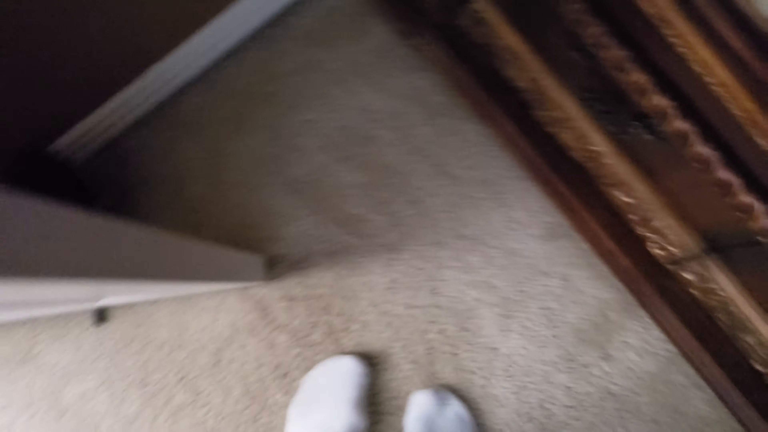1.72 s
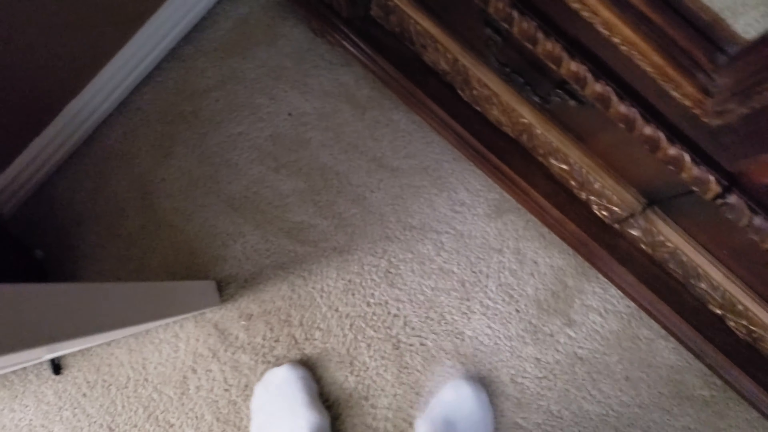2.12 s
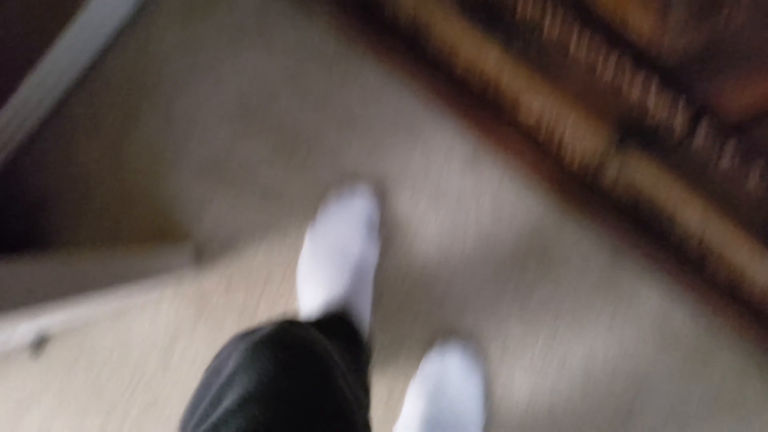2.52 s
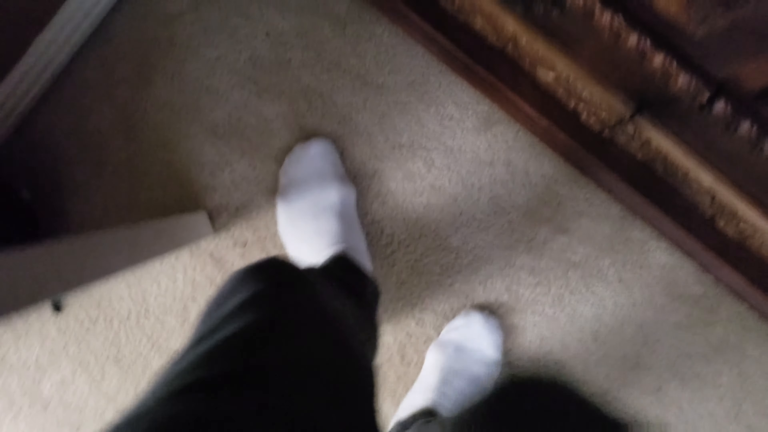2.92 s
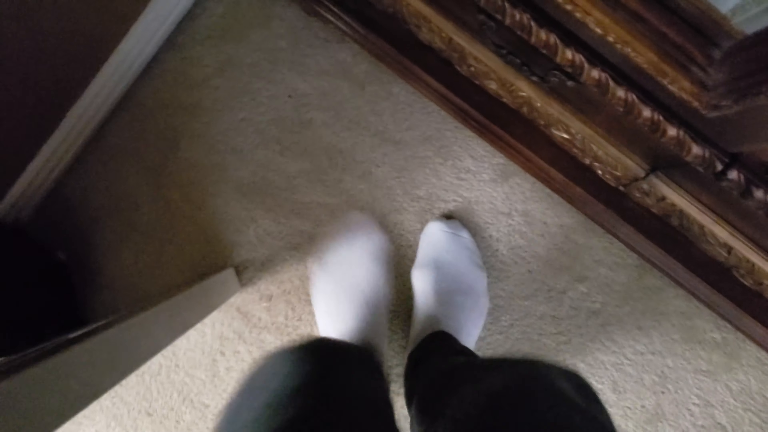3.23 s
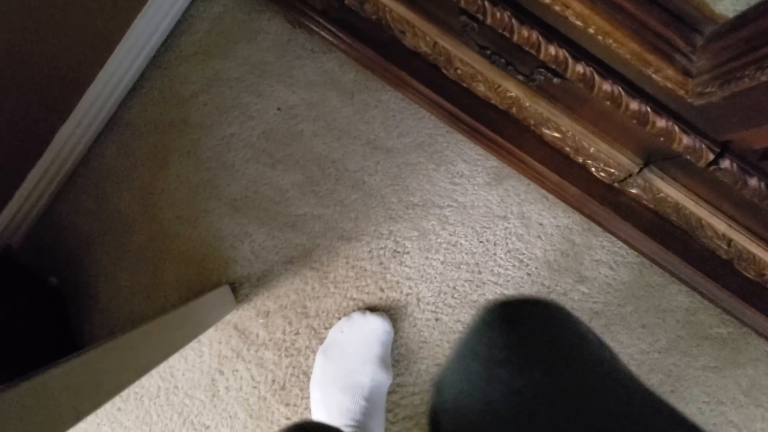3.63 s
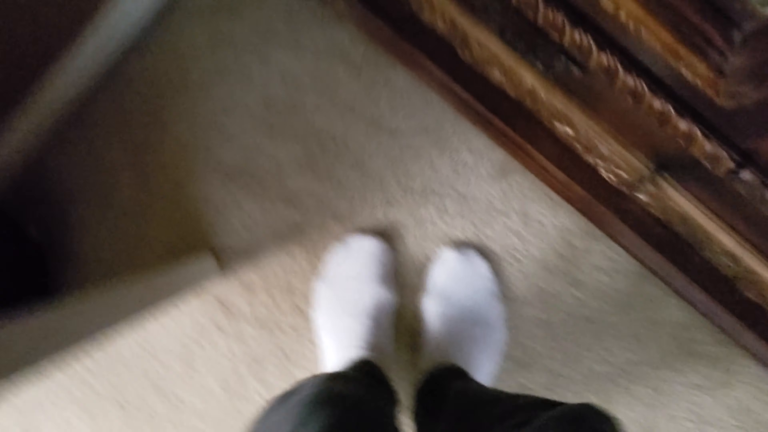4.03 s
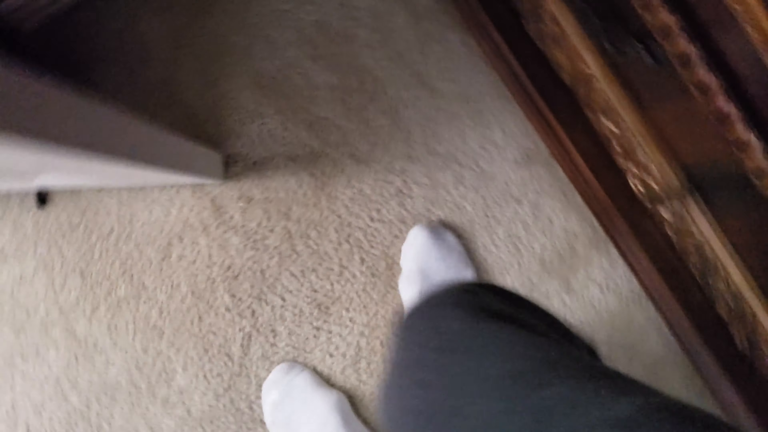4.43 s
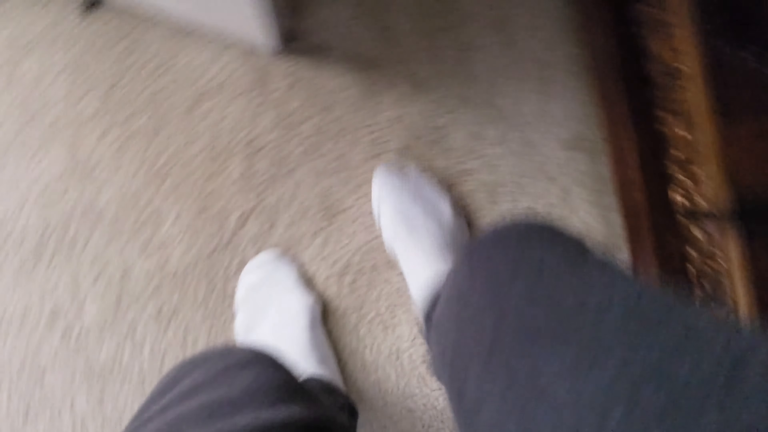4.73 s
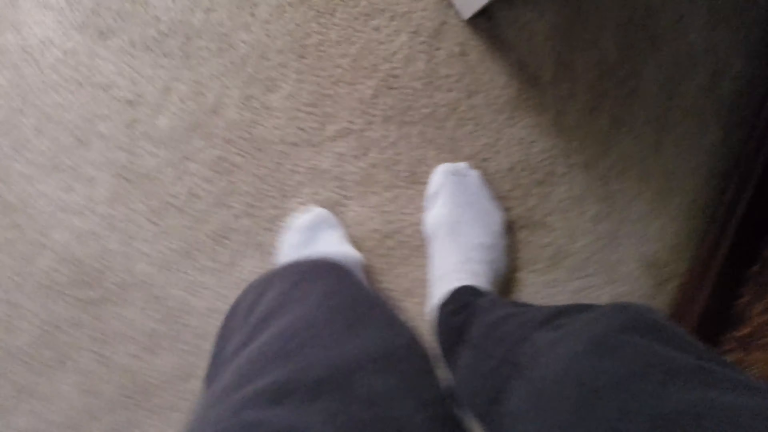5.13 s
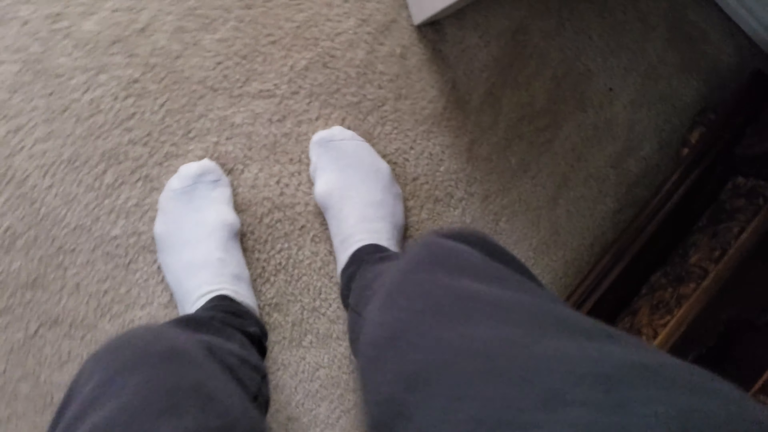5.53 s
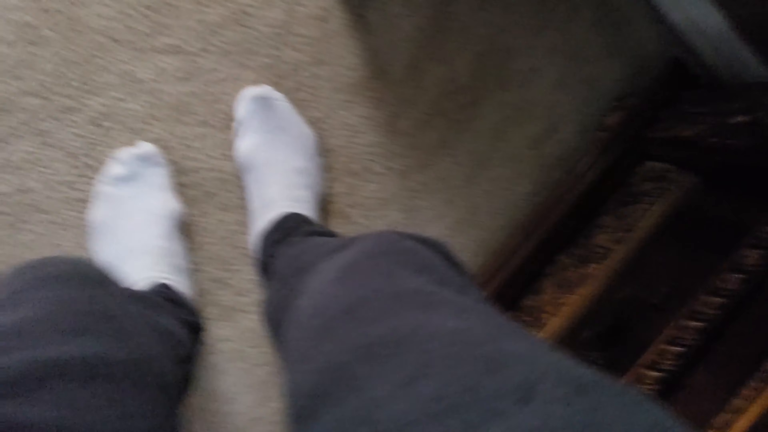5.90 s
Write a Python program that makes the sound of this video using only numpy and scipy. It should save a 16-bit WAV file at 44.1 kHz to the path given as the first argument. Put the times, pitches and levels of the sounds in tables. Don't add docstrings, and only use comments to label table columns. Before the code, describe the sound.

A door leaf brushes carpet, thuds softly and its latch knocks twice, then socked feet step and shuffle away over thick pile in a quiet house.

```python
import sys
import numpy as np
from scipy import signal
from scipy.fft import rfft, irfft
from scipy.io import wavfile
from scipy.ndimage import uniform_filter1d

SR = 44100
rng = np.random.default_rng(int(sys.argv[2]) if len(sys.argv) > 2 else 0)


def generate_wav(signal):
    frames = np.transpose(np.atleast_2d(signal))
    scaled = np.clip(frames, -1, 1) * 32767
    pcm = np.round(scaled).astype(np.int16)
    wavfile.write(sys.argv[1], SR, pcm)


def voltage_ratio(decibels):
    exponent = np.asarray(decibels, float) / 20
    return 10 ** exponent


N = 267246


def rms_one(x):
    return x / np.sqrt(np.mean(x ** 2) + 1e-20)


def in_time(rows):
    s, *columns = np.transpose(rows)
    return [np.interp(np.arange(N) / SR, s, column) for column in columns]


def at_hz(points, hz):
    points_hz, values = np.array(points)[:, 0], np.array(points)[:, 1]
    return np.interp(np.log(hz), np.log(points_hz), values)


def bins_hz():
    return np.maximum(np.fft.rfftfreq(N, 1 / SR), 1)


def bandpass(order, low_hz, high_hz, x):
    return signal.sosfilt(signal.butter(order, [low_hz, high_hz], "band", fs=SR, output="sos"), x)


def drift(rate_hz):
    r = np.exp(-80 * np.pi * rate_hz / SR)
    white = rng.standard_normal(N // 40 + 2002)
    slow = signal.lfilter([1], [1, -2 * r, r * r], white)[2000:]
    return np.interp(np.arange(N) / 40, np.arange(len(slow)), rms_one(slow))


def linger(power, seconds):
    smeared = uniform_filter1d(power, max(round(seconds * SR), 1))
    return 10 * np.log10(np.abs(smeared) + 1e-12)


def coloured(white, spectrum, likeness):
    hz = bins_hz()
    alike = np.clip(at_hz(likeness, hz), 0, 1)
    mid, side = rfft(white) * voltage_ratio(at_hz(spectrum, hz))
    return np.sqrt(1 + alike) * mid + np.sqrt(1 - alike) * side * [[1], [-1]]


def noise(spectrum, likeness):
    return rms_one(irfft(coloured(rng.standard_normal((2, N)), spectrum, likeness), N))


# pitch_hz [Hz], level_db [dB per Hz]
HUSH_COLOUR = [(15, -44.5), (25, -2), (49, -11.5), (68, 3), (90, -9.5), (150, -26), (250, -16), (450, -32),
               (1000, -47), (2000, -64.5), (5000, -65.5), (16000, -42)]
# pitch_hz [Hz], likeness [0-1]
HUSH_LIKENESS = [(60, 0.54), (500, 0.38), (1000, 0.13), (3000, 0.18)]


def quiet_house():
    level_db = -70
    return voltage_ratio(level_db) * noise(HUSH_COLOUR, HUSH_LIKENESS)


ROOM_T60_S, WALL_CUT_HZ = 0.26, 2900


def room(x):
    t = np.arange(SR // 2) / SR
    decay = voltage_ratio(-60 * t / ROOM_T60_S)
    white = rng.standard_normal((2, len(t)))
    low = signal.sosfilt(signal.butter(1, WALL_CUT_HZ, fs=SR, output="sos"), white)
    tail = (low + (white - low) * decay) * decay
    tail = tail * (t > .004)
    tail = tail / np.sqrt(np.sum(tail ** 2, axis=1, keepdims=True))
    return signal.fftconvolve(x, tail, axes=1)[:, :N]


# start_s [s], peak_db [dB], hardness_db of the bright modes [dB], pan_db left over right [dB]
LATCH_CONTACTS = [(0.5057, -24.5, 8, -1.5), (0.5083, -27.5, -1, -8), (.512, -24.5, -6.5, -1),
                  (0.515, -26, -1.5, -2.5), (.521, -32.5, -2, -11), (.601, -26, -3.5, -1),
                  (.604, -34.5, 3, 12), (0.6067, -26.5, 9, -3), (.611, -32.5, -17, -5.5),
                  (.617, -32.5, -4, -1), (.625, -41, 8, -1)]
# pitch_hz [Hz], level_db [dB], t60_s [s]
DOOR_MODES = [(286, -7, 0.098), (305, -19, 0.11), (434.5, -10, 0.11), (552, -6.5, 0.089), (779, -16, 0.089),
              (875, -4, .07), (1160, 2.5, 0.024), (1328, -18.5, 0.094), (1412, -2, 0.031),
              (1802, -3.5, 0.054), (1998, -4, 0.045), (2310, -15, 0.046), (2730, -6.5, 0.02),
              (3110, -6.5, 0.025), (3540, -9.5, 0.016), (4105, -12.5, 0.0053), (4560, -5, 0.015),
              (5710, -18, 0.023), (6920, -19, 0.013)]


def latch():
    s, peak_db, hard_db, pan_db = np.transpose(LATCH_CONTACTS)
    out = np.zeros((2, N))
    for hz, level_db, t60_s in DOOR_MODES:
        r, w = voltage_ratio(-60 / (min(t60_s, .085) * SR)), 2 * np.pi * hz / SR
        uneven_db = rng.normal(0, 2.02, len(s))
        bright_db = hard_db * np.log2(hz / 1500) / 2
        strength = voltage_ratio(peak_db + level_db - 7.0 + bright_db + uneven_db)
        strength = strength * rng.choice([-1, 1], len(s))
        for side, sign in enumerate((1, -1)):
            late_s = side * .0005 + rng.uniform(0, 0.00032, len(s))
            clicks = np.zeros(SR)
            clicks[np.round((s + late_s) * SR).astype(int)] = strength * voltage_ratio(sign * pan_db / 2)
            ring = signal.lfilter([0, np.sin(w)], [1, -2 * r * np.cos(w), r * r], clicks + 1e-18)
            out[side, :SR] += ring
    blows = np.zeros(SR)
    blows[np.round(s * SR).astype(int)] = voltage_ratio(peak_db + 2 * hard_db - 23.0)
    fade = signal.lfilter([1], [1, -voltage_ratio(-60 / (0.016 * SR))], blows + 1e-18)
    out[:, :SR] += fade * bandpass(2, 1500, 8000, rng.standard_normal((2, SR)))
    return out


# time_s [s], level_db [dB]
WEIGHT = [(0.0, -67.5), (0.59, -57.5), (0.78, -71.5), (1.16, -74.5), (1.87, -67.5), (2.45, -60),
          (2.8, -81.5), (3.27, -64), (3.66, -75), (3.81, -63), (4.0, -57), (4.19, -72.5), (4.78, -70.5),
          (5.2, -72), (5.45, -83), (6.06, -86)]
# pitch_hz [Hz], level_db [dB per Hz]
JOIST_COLOUR = [(18, -26), (30, -2.5), (52, 6.5), (72, 6), (100, -47.5)]
# pitch_hz [Hz], level_db [dB per Hz]
BOARD_COLOUR = [(55, -22), (75, 9), (95, 6), (135, 8), (190, -11), (260, -42)]
# pitch_hz [Hz], likeness [0-1]
NEAR_LIKENESS = [(40, 0.63), (130, 0.97), (350, 0.82), (700, 0.45), (1200, 0.067), (3000, 0.14),
                 (8000, 0.031)]
BOARD_BELOW_DB, BOARD_RUB_DB, RUB_FOLLOWS, RUB_LINGER_S = -1.5, -57, 0.67, 0.058
RUB_LAG_S, RUB_BODY_SHARE = 0.015, 0.75


def boards(brush_db, body_db):
    weight_db, = in_time(WEIGHT)
    push = voltage_ratio(2 * (brush_db + RUB_BODY_SHARE * body_db))
    push = np.roll(push, round(RUB_LAG_S * SR))
    rub_db = BOARD_RUB_DB + RUB_FOLLOWS * (linger(push, RUB_LINGER_S) + 55)
    board = np.hypot(voltage_ratio(weight_db + BOARD_BELOW_DB), voltage_ratio(rub_db))
    joist = voltage_ratio(weight_db + 4.5)
    return noise(JOIST_COLOUR, NEAR_LIKENESS) * joist + noise(BOARD_COLOUR, NEAR_LIKENESS) * board


# start_s [s], peak_db [dB], pitch_hz at first [Hz], sag_oct [octaves], length_s [s]
DOOR_THUDS = [
    (.22, -47.5, 94, 0.28, 0.11),
    (.325, -31.5, 101.5, 0.12, .025),
    (.36, -29.5, 99.7, 0.25, 0.029),
    (.385, -34.5, 85.4, .11, 0.025),
]
# start_s [s], peak_db [dB], pitch_hz at first [Hz], sag_oct [octaves], length_s [s]
HEELS = [(1.294, -52.5, 109.8, 0.52, 0.062), (1.703, -47.5, 153, 0.16, 0.018), (1.89, -45, 107, .5, 0.03),
         (2.212, -47.5, 120, 0.24, 0.043), (2.44, -46, 152.4, 0.31, 0.048), (3.019, -60.5, 151, 0.49, .03),
         (3.164, -52, 212, 1, .018), (3.341, -44.5, 142.6, 0.2, 0.051), (3.631, -47, 114, 1, .042),
         (3.831, -29.5, 115, 0.97, 0.039), (4.0, -51, 141.6, 0.35, 0.051), (4.211, -55, 139, 0.48, .026),
         (4.389, -45.5, 98, 0.2, 0.013), (5.003, -46, 108, .99, 0.034), (5.126, -50, 93.5, 0.19, 0.017),
         (5.251, -49, 101.3, 0.11, .042), (5.519, -55, 131, .28, .04)]
# start_s [s], peak_db [dB], pitch_hz at first [Hz], length_s [s]
SETTLES = [(1.401, -48, 54, 0.047), (1.759, -51.5, 41, 0.093), (1.928, -47.5, 41, 0.067),
           (2.28, -36.5, 51.8, .041), (2.45, -47, 40, 0.06), (3.196, -46, 42.5, .06), (3.87, -39, 41, .039),
           (4.045, -46, 36, 0.057), (4.369, -53, 47.6, 0.084), (4.729, -65, 68, 0.049),
           (5.05, -49.5, 44.7, 0.037), (5.313, -49.5, 43, .032)]
JOIST_SAG_OCTAVES = 0.29


def thuds():
    out = np.zeros(N)
    settles = [(s, db, hz, JOIST_SAG_OCTAVES, length_s) for s, db, hz, length_s in SETTLES]
    for s, peak_db, hz, sag, length_s in DOOR_THUDS + HEELS + settles:
        u = np.linspace(0, 3, round(3 * max(length_s, .01) * SR))
        phase = np.cumsum(2 * np.pi * hz * 2 ** (-sag * (u - .4)) / SR)
        push = np.minimum(u / 0.14, 1) * np.exp(-np.maximum(u - .7, 0) ** 2 / 0.5)
        wave = np.sin(phase) + 0.18 * push * np.cos(2 * phase)
        start = round(s * SR)
        out[start:start + len(u)] += voltage_ratio(peak_db) * push * wave
    return out * voltage_ratio([[.6], [-.6]])


# start_s [s], peak_db [dB], pitch_hz [Hz]
TICKS = [
    (0.244, -46, 3000),
    (0.816, -70.5, 1600),
    (1.497, -57, 4960),
    (1.8956, -55, 4000),
    (2.3925, -49, 6560),
    (3.805, -42, 4000),
    (4.371, -54.5, 5800),
    (4.9626, -59, 5000),
]


def ticks():
    out, t = np.zeros((2, N)), np.arange(SR // 40) / SR
    for s, peak_db, hz in TICKS:
        snap = bandpass(1, hz / 1.2, hz * 1.7, rng.standard_normal((2, len(t))))
        start = round(s * SR)
        out[:, start:start + len(t)] += voltage_ratio(peak_db + 0.5 - 60 * t / .03) * rms_one(snap)
    return out


# peak_s [s], pitch_hz [Hz], level_db [dB rms], length_s [s]
SQUEAKS = [(1.44, 2350, -82, .06), (1.82, 2400, -83, .06), (2.07, 2350, -82, .05), (4.27, 2600, -78, .06),
           (4.45, 4870, -78, .04), (4.55, 2550, -75, .12), (4.74, 2550, -77, .1), (4.85, 2400, -69, .05),
           (5.68, 2850, -84, .1), (5.52, 1400, -72, .04), (.83, 6700, -82, .05), (4.62, 560, -66, .035),
           (.36, 650, -56, .04)]


def squeaks():
    t, out = np.arange(N) / SR, 0
    white = rng.standard_normal((2, N))
    for s, hz, level_db, length_s in SQUEAKS:
        narrow = bandpass(2, hz * .95, hz * 1.05, white)
        out = out + voltage_ratio(level_db) * rms_one(narrow) * np.exp(-((t - s) / length_s) ** 2)
    return out


# peak_s of motion [s], brush_db [dB], rise_s [s], fall_s [s], body_db of dull part over brush [dB]
SWEEPS = [
    (.05, -74, 0.18, 0.15, -4.5),
    (.243, -59, .065, .075, 1.5),
    (.371, -59, .1, 0.15, 9),
    (.47, -60, 0.31, 0.42, 5),
    (.62, -59, 0.35, 0.11, 9.5),
    (0.729, -67.5, 0.19, 0.06, 19),
]
SOCK_STROKES = [(1.23, -77, 0.065, .1, -13), (1.355, -57.5, 0.14, 0.067, -3.5),
                (1.534, -52, 0.045, 0.11, -9), (1.643, -62.5, .054, 0.23, -5),
                (1.73, -53, 0.097, .037, -7.5), (1.92, -50.5, 0.051, 0.12, -3.5),
                (1.978, -53.5, 0.11, .056, -8), (2.135, -57.5, .055, 0.2, -7),
                (2.244, -56, 0.18, .026, -4.5), (2.409, -54, .031, 0.092, -9), (2.45, -49, 0.057, 0.077, -1),
                (2.5, -54, 0.084, .03, -6.5), (2.687, -61.5, .062, 0.073, -9.5),
                (3.042, -76, 0.79, 0.13, -3.5),
                (3.163, -51.5, 0.049, 0.075, 0), (3.394, -52.5, 0.12, .06, -2.6),
                (3.65, -52.5, 0.096, 0.094, -2), (3.704, -64.5, 0.1, 0.026, -10),
                (3.815, -52, 0.038, 0.063, 0), (4.021, -48.5, 0.039, 0.038, -5),
                (4.209, -65.6, 0.05, 0.049, -4.8), (4.26, -66.5, 0.1, 0.097, -2),
                (4.364, -70, .025, 0.073, -1), (4.508, -62, 0.084, 0.14, -6.5),
                (4.607, -52.5, 0.034, 0.088, -6), (4.868, -56.5, 0.1, 0.061, -6),
                (4.975, -56, 0.026, 0.067, -9), (5.181, -65, .078, 0.13, -7.5),
                (5.338, -59, 0.072, .103, -6.5), (5.544, -57, 0.087, 0.048, -7.5),
                (5.63, -78.5, 0.22, 0.11, -9), (5.824, -69.5, 0.13, 0.15, -10), (6.04, -83, 0.17, .2, -8)]
# time_s [s], sheen_db over brush [dB], pan_db left over right [dB]
AIM = [(0, -7, -1), (.4, -4, 0), (.7, -10, -0.5), (1.3, -8, -1.5), (1.7, -11, -1.5), (1.95, -5, -.5),
       (2.2, -6, -1.5), (2.45, -4.5, -0.5), (2.7, -5.5, -1.5), (3.2, -2.5, -0.5), (4.0, -2, -0.5),
       (4.5, 1, -1.5), (4.85, -9, -2.5), (5.0, -2.5, -5), (5.5, -8.5, -4), (6.06, 1, 0.5)]
STROKE_ROUNDNESS = 1.83
CLOTH_DB, CLOTH_FOLLOWS, CLOTH_LINGER_S, CLOTH_BODY_DB, CLOTH_SHEEN_DB = -78.5, 0.52, 0.21, 3.5, 6
STILL_DB = -89


def motion():
    t = np.arange(0, N + 64, 64) / SR
    s, level_db, rise, fall, body_db = np.transpose(SWEEPS + SOCK_STROKES)[:, :, None]
    away = np.abs(t - s) / np.maximum(np.where(t < s, rise, fall), .01)
    each = voltage_ratio(2 * (level_db - 20 * away ** STROKE_ROUNDNESS))
    walking = each[len(SWEEPS):]
    sums = each.sum(axis=0), (each * body_db).sum(axis=0), walking.sum(axis=0)
    strokes, dull, walking = (np.interp(np.arange(N) / SR, t, v) for v in sums)
    cloth_db = CLOTH_DB + CLOTH_FOLLOWS * (linger(walking, CLOTH_LINGER_S) + 58.5)
    cloth = voltage_ratio(2 * cloth_db) + voltage_ratio(2 * STILL_DB)
    sheen_db, pan_db = in_time(AIM)
    power = strokes + cloth
    body_db = (dull + cloth * CLOTH_BODY_DB) / power
    sheen_db = (strokes * sheen_db + cloth * CLOTH_SHEEN_DB) / power
    return 10 * np.log10(power), body_db, sheen_db, pan_db


# pitch_hz [Hz], level_db [dB per Hz]
PILE_COLOUR = [(90, -27.5), (150, -3.5), (300, -10.5), (600, -13.5), (950, -15.5), (1600, -18.5),
               (2300, -18.5), (4600, -17.5), (16000, -17.5)]


def brushing(moves, grain_db, patchy_db):
    brush_db, body_db, sheen_db, pan_db = moves
    grains = np.minimum(rng.exponential(1, (2, N)), 5)
    fibres = rng.standard_normal((2, N)) * voltage_ratio(grain_db * grains)
    pair, hz = coloured(fibres, PILE_COLOUR, NEAR_LIKENESS), bins_hz()
    pair = pair / np.std(irfft(pair.mean(axis=0) * (hz > 1500) * (hz < 7000), N))
    out = 0
    together = drift(22)
    for centre in 180 * 2 ** np.arange(0, 7, .75):
        band = np.cos(np.pi / 2 * np.clip(np.log2(hz / centre) / .75, -1, 1)) ** 2
        dull = at_hz([(600, 0.84), (1500, 0.36), (3000, 0)], centre)
        bright = at_hz([(3500, 0), (6000, 0.5), (9500, 0.95)], centre)
        tilt_db = dull * (body_db + 3.5) + bright * (sheen_db + 0.5)
        flicker = drift(13)
        flicker = flicker - 0.76 * uniform_filter1d(flicker, size=SR // 6)
        out = out + irfft(pair * band, N) * voltage_ratio(tilt_db + patchy_db * (flicker + 0.22 * together))
    return out * voltage_ratio(brush_db + pan_db / 2 * [[1], [-1]])


def scene():
    room_db, sweep_lag_s = -15, .0003
    knocks = latch()
    moves = motion()
    brush_db, body_db = moves[:2]
    pile = brushing(moves, grain_db=1.46, patchy_db=2.5)
    lag = round(sweep_lag_s * SR)
    pile[1, lag:SR] = pile[1, :SR - lag].copy()
    door = knocks + voltage_ratio(room_db) * room(knocks)
    floor = boards(brush_db, body_db) + thuds()
    return quiet_house() + door + floor + ticks() + squeaks() + pile


def band_limit(x):
    return signal.sosfilt(signal.butter(12, 15800, fs=SR, output="sos"), x)


# pitch_hz [Hz], level_db
# [dB]
MIC_PORT = [(2000, -1), (2500, 1.5), (3100, -0.5), (4600, -2), (5800, 1.5), (6700, 4), (7400, 1),
            (7900, -7.5), (8700, -11.5), (10000, -5.5), (11800, 0.5), (14900, 1), (15200, -4)]


def record(dry):
    colour = voltage_ratio(at_hz(MIC_PORT, bins_hz()))
    mix = irfft(rfft(dry) * colour, N)
    return band_limit(mix)


dry = scene()
out = record(dry)
generate_wav(out)
```